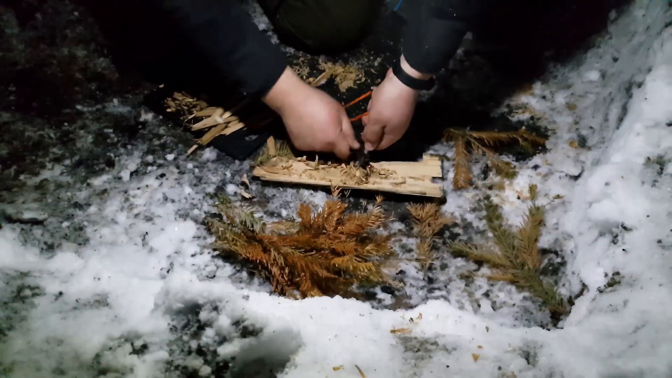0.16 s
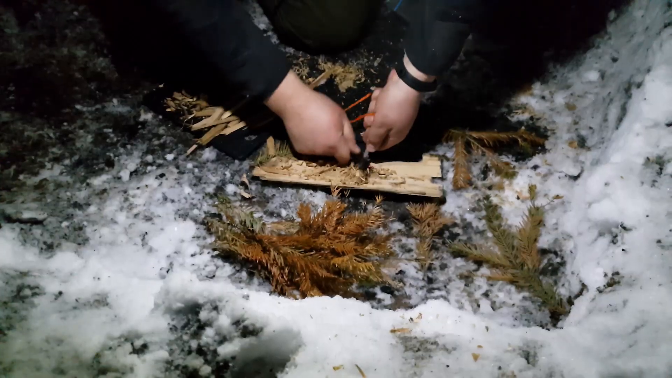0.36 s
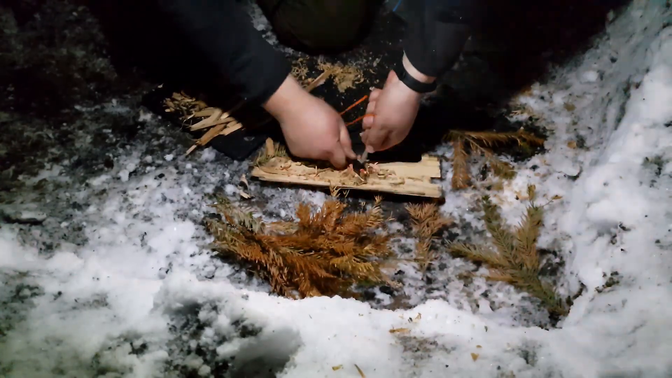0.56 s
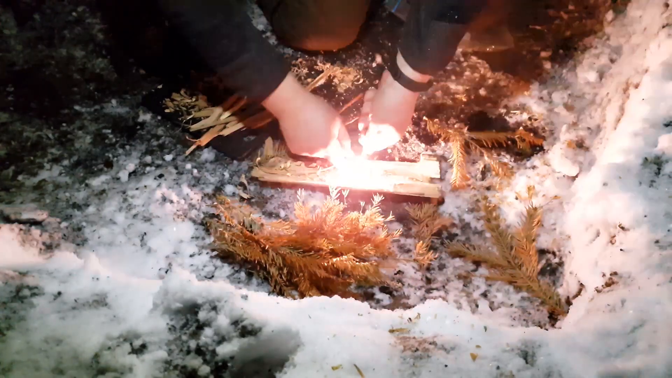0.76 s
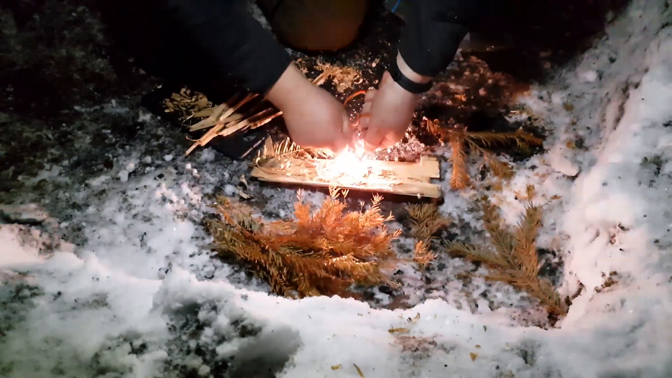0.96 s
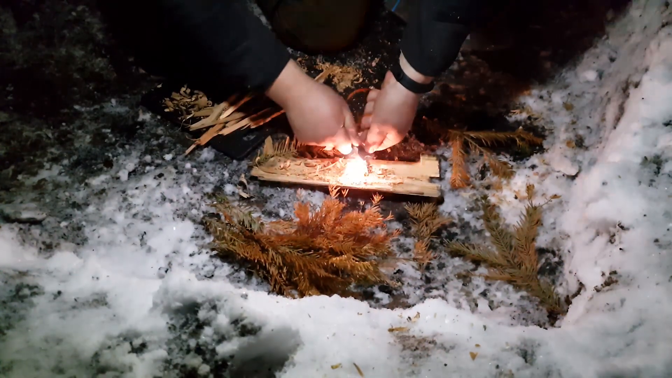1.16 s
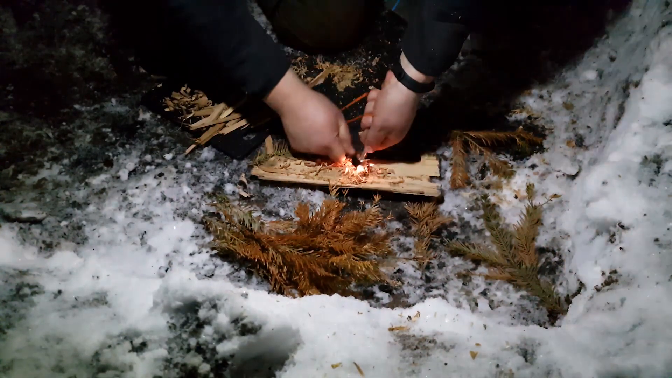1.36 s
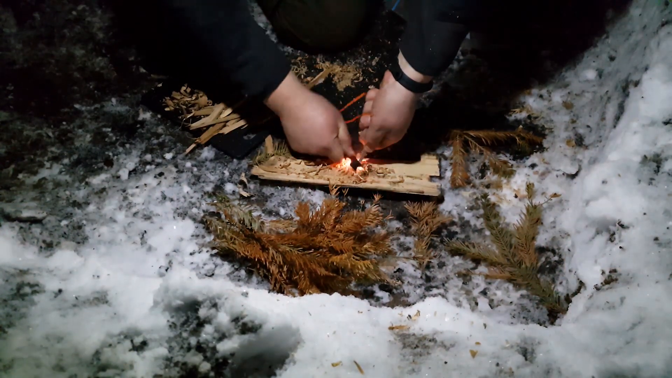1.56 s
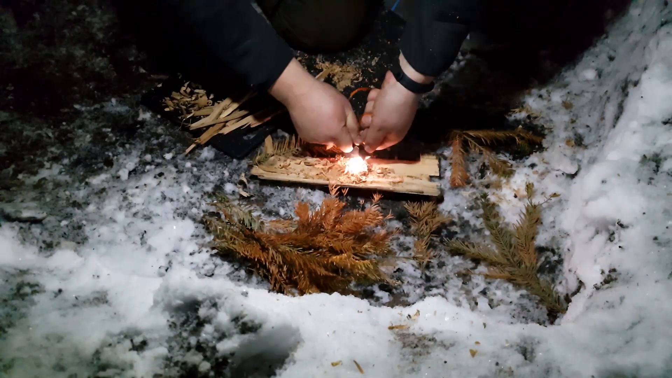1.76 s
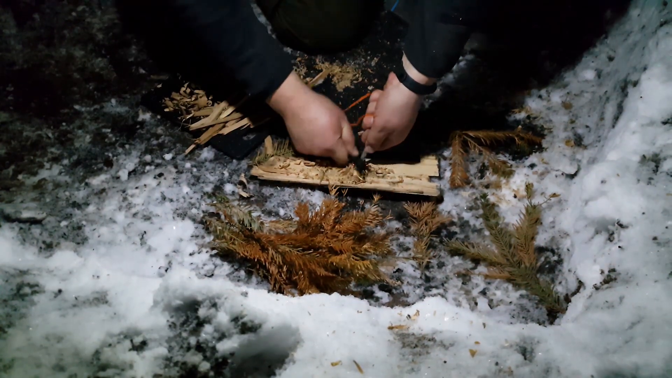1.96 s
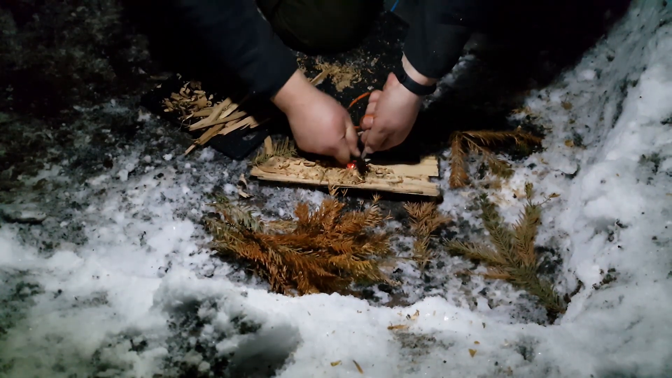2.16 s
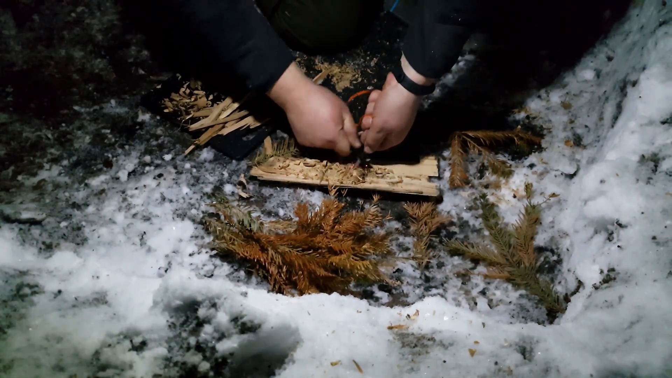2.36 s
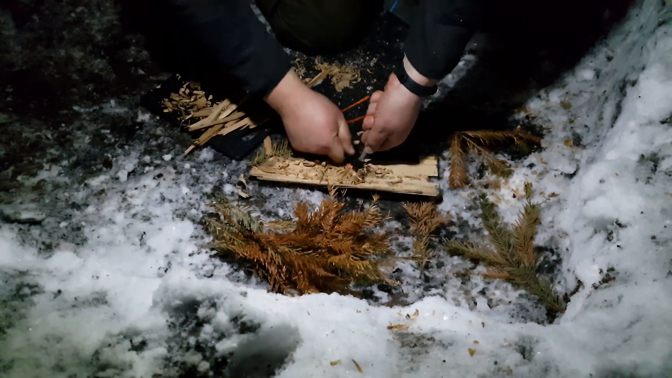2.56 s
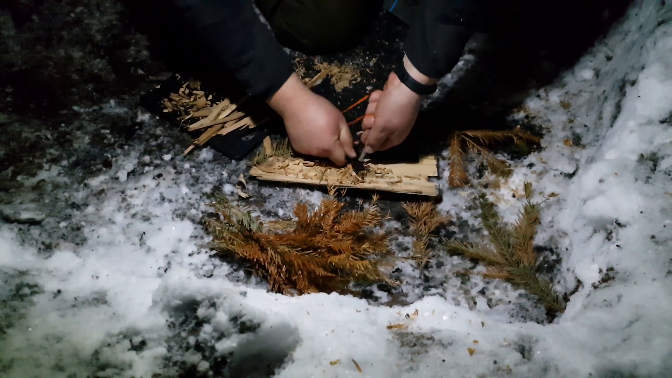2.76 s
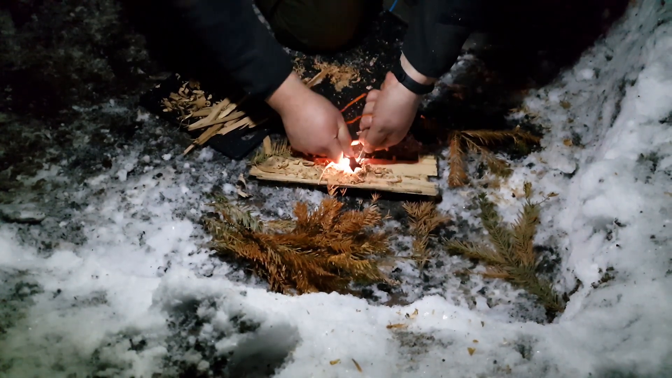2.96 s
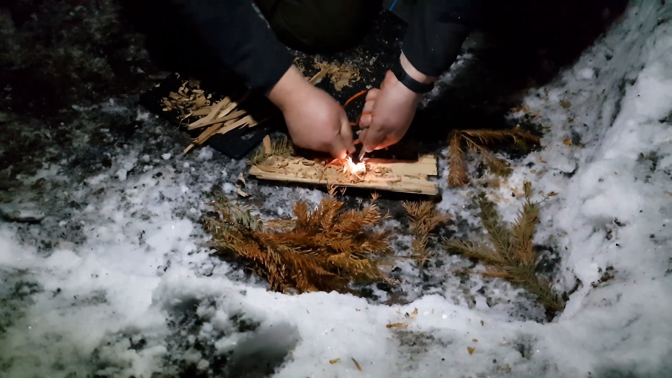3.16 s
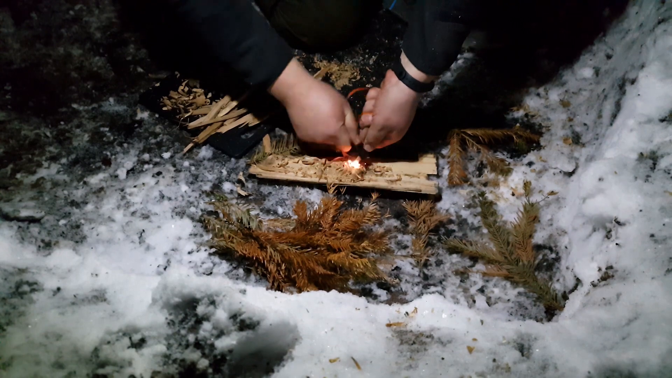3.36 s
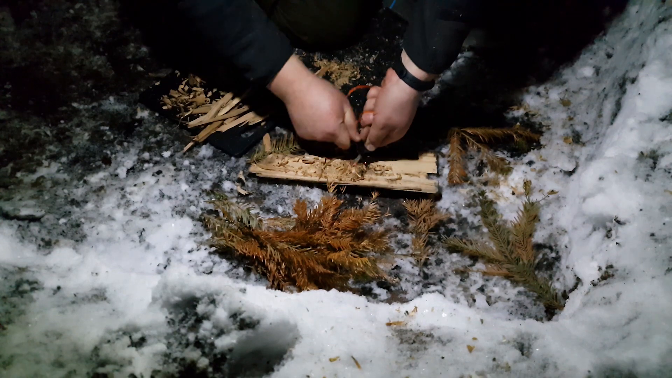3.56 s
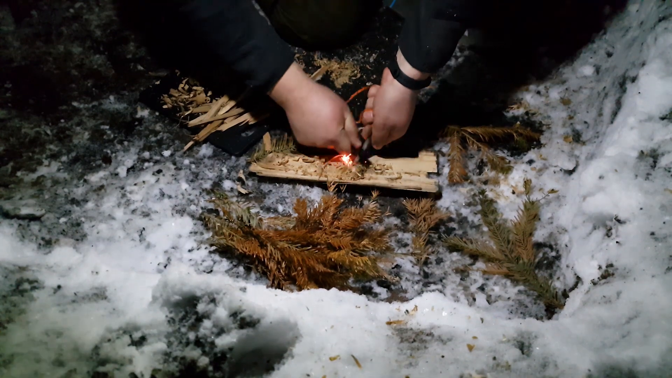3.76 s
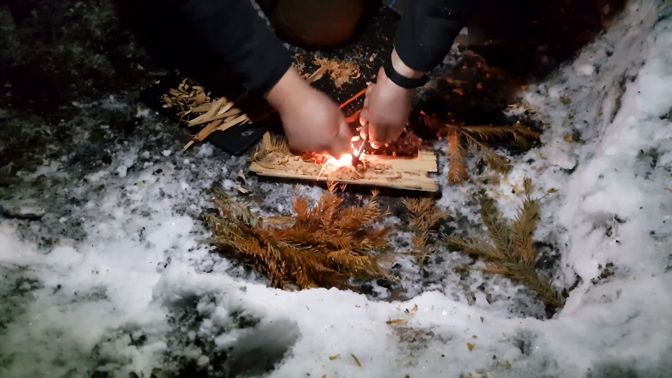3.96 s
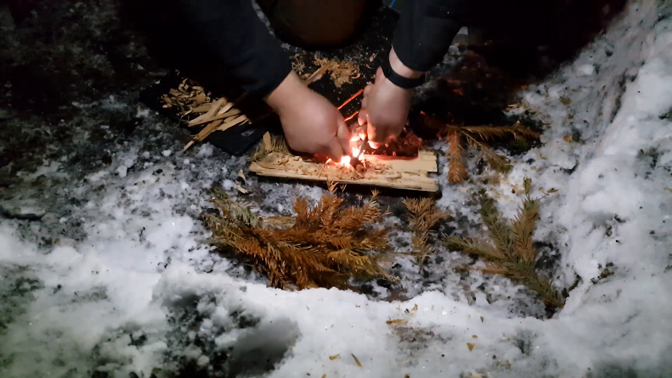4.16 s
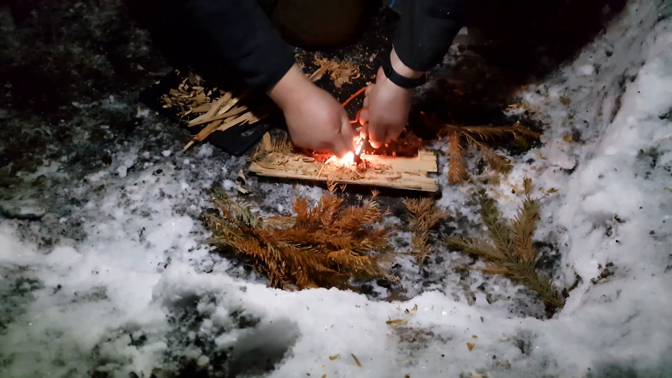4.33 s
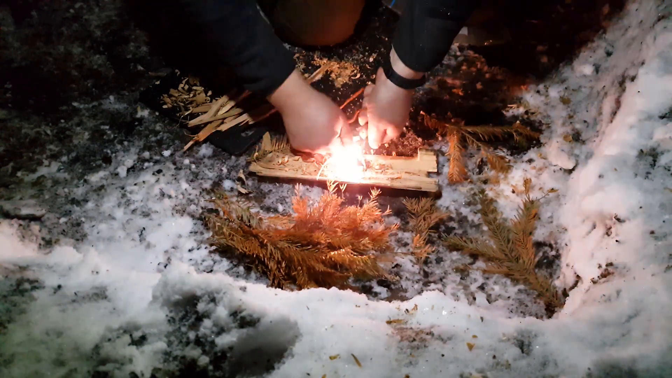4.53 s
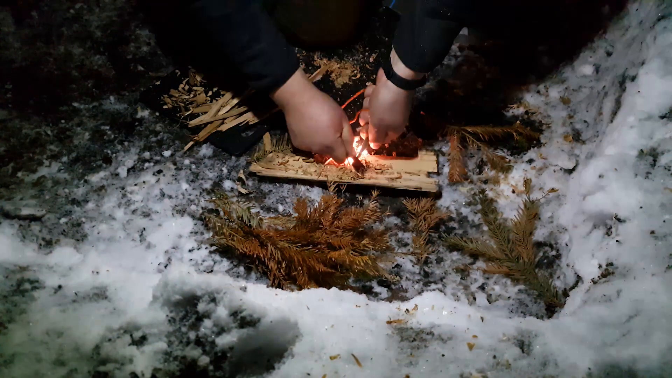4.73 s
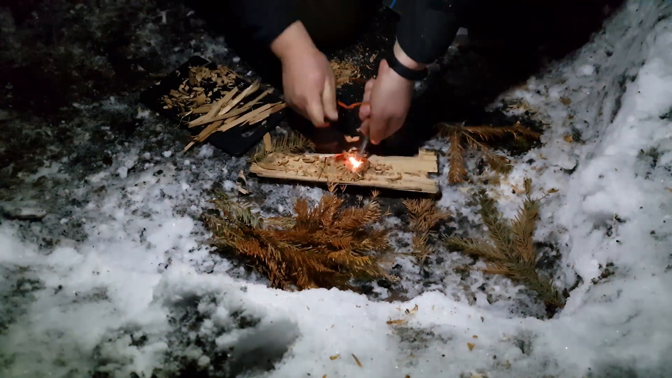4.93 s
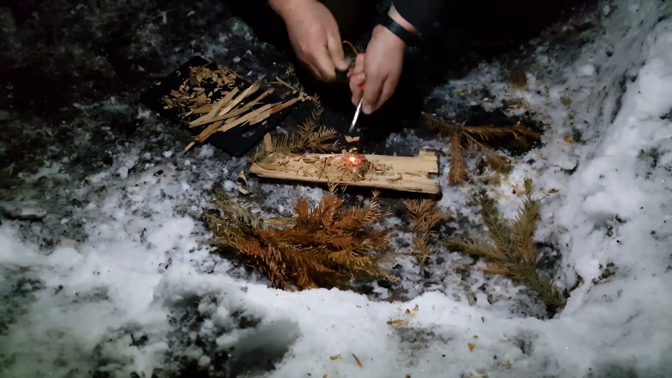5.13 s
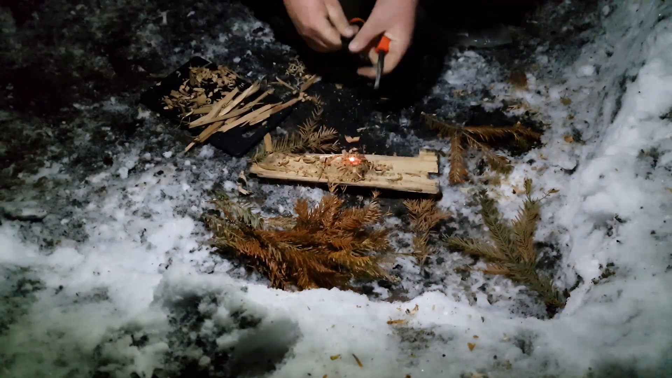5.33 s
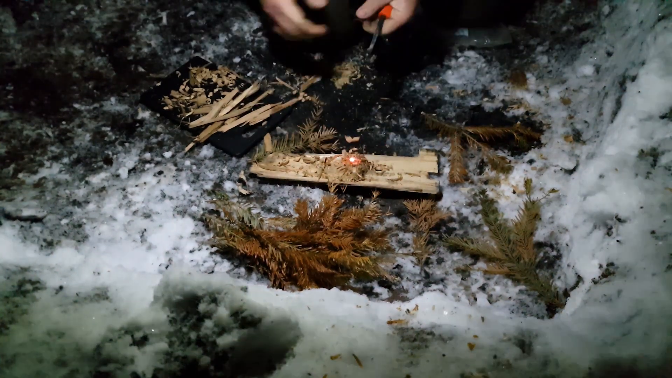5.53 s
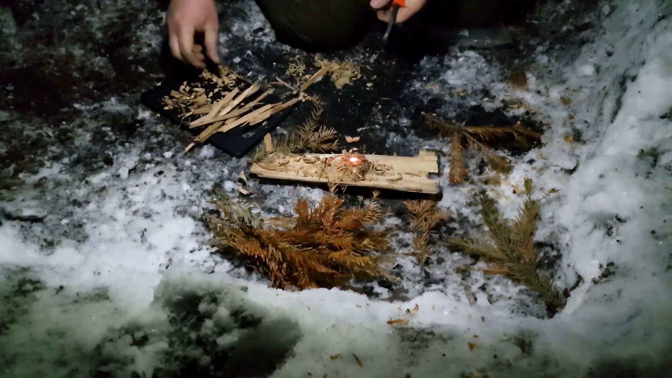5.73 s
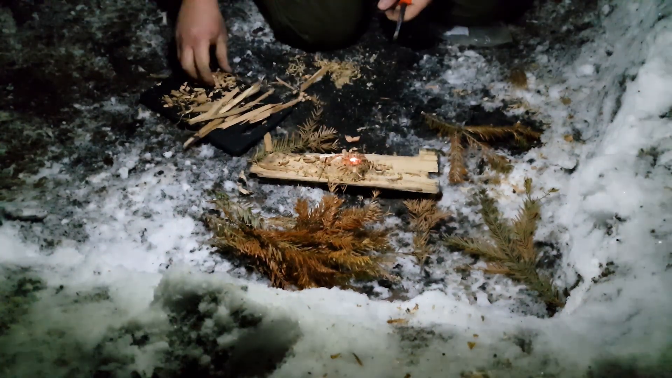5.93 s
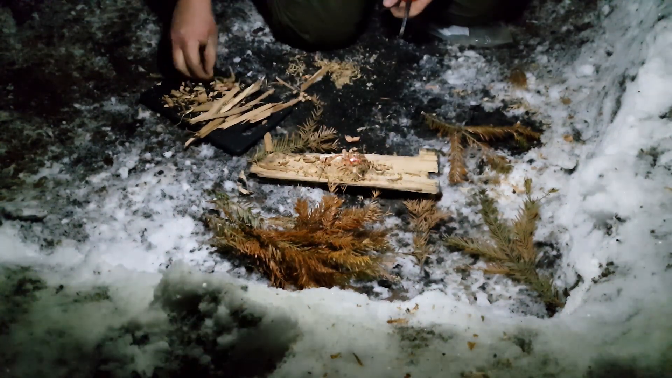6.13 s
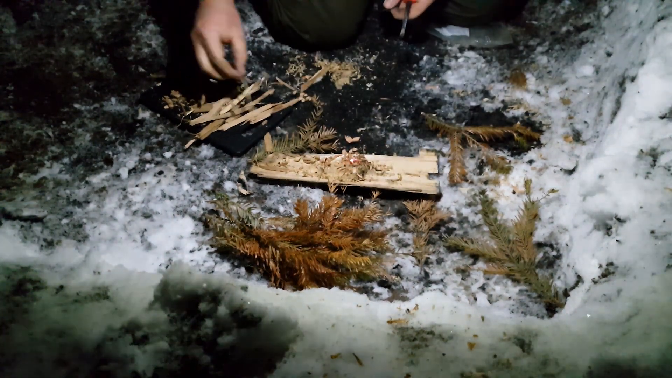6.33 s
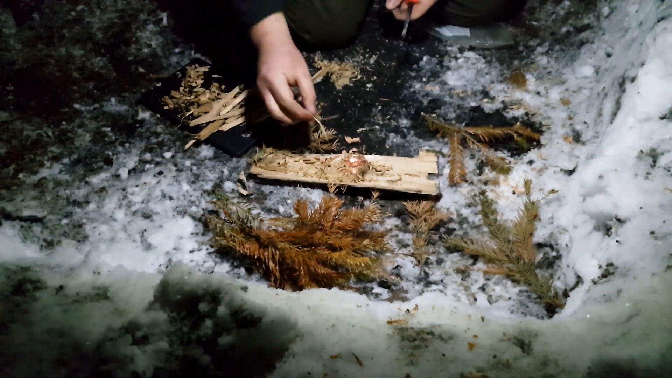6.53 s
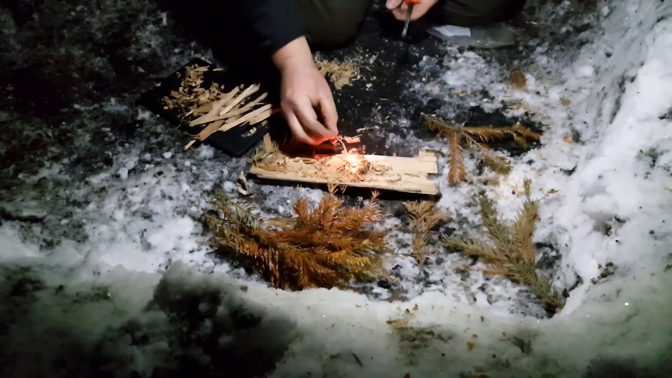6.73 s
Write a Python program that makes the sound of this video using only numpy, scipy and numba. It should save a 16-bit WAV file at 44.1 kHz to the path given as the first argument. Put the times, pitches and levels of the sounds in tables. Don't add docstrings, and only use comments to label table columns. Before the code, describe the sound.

From the very start, a steel striker scrapes a spark rod in quick back-and-forth strokes, roughly thirteen a second, its tip grinding a small wooden board. Each stroke is a short, gritty, bright rasp with a dry woody middle. Uneven clacks of the striker catching the board stand out, notably near 0.3, 1.3, 1.75, 3.2, 4.05 and 4.6 s. Metal dust sizzles most around 1 s and from 3.9 s, with sharp spark pops throughout. Strokes lengthen and run together after 3.9 s, stopping at 4.8 s. The fizz and last pops fade by about 5.2 s as a sleeve swishes briefly. Then it is much quieter: sparse tiny ticks, becoming denser from 6 to 6.7 s with a soft rustle, as fingers handle shavings and twigs. Faint outdoor rumble lies beneath. The stereo microphone is close and dry, sound weighted left.

```python
import sys
import numpy as np
from scipy import signal
from scipy.fft import rfft, irfft
from scipy.io import wavfile
from scipy.ndimage import uniform_filter1d
from numba import njit

SR = 44100
rng = np.random.default_rng(int(sys.argv[2]) if len(sys.argv) > 2 else 0)


def invert_db(level):
    return 10 ** (np.asarray(level, dtype=float) / 20)


def dump_mix(stems):
    frames = np.atleast_2d(stems).T
    limited = np.clip(frames, -1, 1)
    pcm = np.round(limited * 32767).astype(np.int16)
    wavfile.write(sys.argv[1], SR, pcm)


N = 303849

# pitch_hz [Hz], width_hz [Hz], level_db [dB]
BOARD_LOW = [(620, 200, -9.5), (900, 260, -7), (1200, 220, -1), (1430, 260, -1.5)]
# pitch_hz [Hz], width_hz [Hz], level_db [dB]
BOARD_HIGH = [(1950, 330, -1), (2300, 400, -5.5)]
# pitch_hz [Hz], width_hz [Hz], level_db [dB]
STEEL = [(3600, 900, -2), (5200, 1300, -4), (6500, 1200, 1.5)]
# pitch_hz [Hz], width_hz [Hz], level_db [dB]
EDGE = [(10800, 1800, -3.5), (12800, 1300, -3), (15300, 1600, -2.5)]
# pitch_hz [Hz], width_hz [Hz], level_db [dB]
GROUND = [(110, 70, 0), (190, 110, 0), (270, 110, -2)]


def curve(table):
    start_s, *columns = np.transpose(table)
    t = np.arange(N) / SR
    return [np.interp(t, start_s, column, left=-120, right=-120) for column in columns]


def over_hz(table):
    pitch_hz, value = np.transpose(table)
    every_hz = np.fft.rfftfreq(N, 1 / SR)
    return np.interp(np.log(every_hz + 1), np.log(pitch_hz), value)


def walk(rate_hz):
    hold = int(SR / rate_hz)
    levels = rng.standard_normal(N // hold + 1)
    return uniform_filter1d(np.repeat(levels, hold), hold // 2)[:N]


@njit
def resonator(x, pitch_hz, width_hz):
    y = np.empty(len(x))
    band, low = 0., 0.
    for i in range(len(x)):
        g = np.tan(np.pi * pitch_hz[i] / SR)
        damping = width_hz / pitch_hz[i]
        v = (band + g * (x[i] - low)) / (1 + g * (g + damping))
        band = 2 * v - band
        low = low + 2 * g * v
        y[i] = damping * v
    return y


def body(x, modes, drift=0.):
    out = 0
    for k, (pitch_hz, width_hz, level_db) in enumerate(modes):
        centre = np.minimum(pitch_hz * (1 + drift * walk(12)), .45 * SR)
        once = resonator(x, centre, 1.5 * width_hz)
        twice = resonator(once, centre, 1.5 * width_hz)
        out = out + (-1) ** k * invert_db(level_db) * twice
    return out


def grind(envelope, modes, rate, spread_db, bed, drift):
    hits = rng.random(N) < rate / SR
    grains = hits * invert_db(spread_db * rng.exponential(size=N)) * rng.standard_normal(N)
    grit = grains / np.std(grains) + bed * rng.standard_normal(N)
    grit *= invert_db(2.5 * walk(90))
    gain = np.std(body(grit, modes))
    return body(grit * envelope, modes, drift) / gain


def strike(start_s, peak_db, modes, crumbs_db, crumbs_s):
    clicks = np.zeros(N)
    np.add.at(clicks, np.minimum((start_s * SR).astype(int), N - 1), invert_db(peak_db))
    spray = np.exp(-np.arange(int(6 * crumbs_s * SR)) / (crumbs_s * SR))
    crumbs = np.roll(signal.fftconvolve(clicks, spray)[:N], -30) * rng.standard_normal(N)
    single_click = np.arange(N) == 999
    peak = np.abs(signal.hilbert(body(single_click, modes)[:4096])).max()
    return body(clicks + invert_db(crumbs_db) * crumbs, modes) / peak


def air():
    # pitch_hz [Hz], level_db [dB per Hz]
    air_colour = [(15, -52), (25, -9.5), (74, -3), (130, -21), (170, -10.5), (256, -24), (1400, -46.5),
                  (1740, -27.5), (2760, -35.5), (16000, -45.5)]
    swelling = rng.standard_normal(N) * invert_db(1.5 * walk(3))
    x = irfft(rfft(swelling) * invert_db(over_hz(air_colour)), N)
    return x * invert_db(-62.5) / np.std(x)


def contact(start_s, end_s, start_db, end_db, rise_s, fall_s):
    t, out = np.arange(N) / SR, np.zeros(N)
    for start, end, first_db, last_db in zip(start_s, end_s, start_db, end_db):
        part = slice(max(int((start - .04) * SR), 0), int((end + .05) * SR))
        before = np.maximum(start - t[part], 0)
        after = np.maximum(t[part] - end, 0)
        ramp = invert_db(np.interp(t[part], [start, end], [first_db, last_db]))
        out[part] += ramp * np.exp(-before / rise_s - after / fall_s)
    return out


def scraping():
    # start_s [s], end_s [s], board_start_db [dB], board_end_db [dB], steel_db [dB],
    # edge_db [dB against the steel]
    strokes = [(0.0, 0.011, -50.0, -55, -65, -15), (0.027, 0.114, -38.5, -39, -38, -3.7),
               (0.141, 0.186, -41.5, -41.5, -46.5, -7), (0.225, 0.294, -39.5, -40.5, -39, -9),
               (0.322, 0.368, -39, -40.5, -46.5, -7), (0.4, 0.48, -45, -36, -39.5, -2),
               (0.509, 0.556, -40.5, -44, -38.5, -9.5), (0.588, 0.645, -41, -42.5, -37, -2),
               (0.683, 0.737, -42, -41.5, -34.5, -9), (0.766, 0.821, -47.5, -28, -34, -7.4),
               (0.86, 0.907, -40, -39.5, -52.5, -1.5), (0.938, 0.988, -42.5, -37.5, -35.5, -5.5),
               (1.021, 1.076, -39, -44, -37.5, -5.5), (1.1, 1.151, -34.5, -36, -31, -11),
               (1.177, 1.213, -36.5, -39.2, -37.5, -9), (1.247, 1.326, -43.5, -46, -40.9, -8),
               (1.335, 1.378, -42, -43.5, -45, -4), (1.41, 1.473, -38.5, -40, -38.5, -7.5),
               (1.501, 1.539, -40.0, -38, -38, -3.2), (1.574, 1.63, -39.5, -40.5, -45.5, -6.5),
               (1.652, 1.693, -39.5, -45.1, -43.5, -4.5), (1.726, 1.765, -41.5, -33.5, -38.5, -8.2),
               (1.799, 1.833, -41.5, -42.0, -36, -5), (1.866, 1.938, -41.5, -45.5, -38.5, -8.5),
               (1.959, 1.992, -42, -44, -58, -2), (2.015, 2.071, -44, -40, -39, -5.5),
               (2.088, 2.12, -45.5, -36, -44.2, -6.5), (2.153, 2.215, -44, -40.5, -37.5, -6.5),
               (2.231, 2.271, -48, -42.5, -50.5, -7), (2.295, 2.344, -33.5, -41, -42.5, -6),
               (2.377, 2.42, -41.5, -40.5, -41.5, -7.5), (2.44, 2.493, -40, -39.5, -39.5, -9.5),
               (2.53, 2.571, -39.5, -40.5, -42.5, -8.5), (2.599, 2.674, -39, -47, -41.5, -6.5),
               (2.688, 2.726, -41, -38, -40.5, -11), (2.783, 2.841, -34.5, -42.5, -31.5, -6.5),
               (2.881, 2.938, -50, -46, -55, -7), (2.965, 3.009, -41, -27, -35, -7.5),
               (3.054, 3.097, -38, -41, -34.5, -10), (3.133, 3.201, -45.5, -39, -41.5, -2),
               (3.228, 3.275, -44, -41, -37, -10), (3.302, 3.361, -45, -40, -39.5, -7.5),
               (3.4, 3.455, -44.5, -48.5, -48, -9.2), (3.467, 3.524, -46, -40.5, -37.5, -7.5),
               (3.571, 3.619, -40.5, -50.5, -47.5, -5.5), (3.65, 3.72, -52, -41.5, -37.5, -9),
               (3.74, 3.785, -41.6, -45, -38.5, -7.5), (3.822, 3.895, -50.5, -40, -37.5, -3),
               (3.907, 3.994, -48.5, -48, -37.5, -7.5), (4.007, 4.139, -43.5, -47.4, -35.5, -10),
               (4.179, 4.234, -47.5, -43.5, -41.3, -2.5), (4.247, 4.311, -50.5, -39, -40.5, -6.5),
               (4.356, 4.436, -43, -44, -40, -1), (4.437, 4.521, -41, -43.5, -36.5, -8.5),
               (4.522, 4.608, -45.5, -46, -40.5, -2.5), (4.609, 4.673, -43, -45, -36, -5.9),
               (4.692, 4.79, -48, -38, -40.5, -7.5)]
    # start_s [s], level_db [dB]
    shake = [(0.0, -58.5), (1.48, -54.5), (1.49, -58), (4.76, -53.5), (5.0, -69)]
    start_s, end_s, start_db, end_db, steel_db, edge_db = np.transpose(strokes)
    lean = .3 * (end_db - start_db)
    edge_db = edge_db + steel_db

    push = contact(start_s, end_s, start_db, end_db, .004, .004)
    steel_push = contact(start_s, end_s, steel_db - lean, steel_db + lean, .005, .006)
    edge_push = contact(start_s, end_s, edge_db - lean, edge_db + lean, .005, .005)
    pulsing = .6 + .8 * np.tanh(push / invert_db(-45))
    ground_push = invert_db(curve(shake)[0]) * pulsing

    board = grind(push, BOARD_LOW + BOARD_HIGH, rate=1500., spread_db=2.5, bed=.4, drift=.05)
    steel = grind(steel_push, STEEL, rate=4000., spread_db=3.5, bed=.5, drift=.06)
    edge = grind(edge_push, EDGE, rate=5000., spread_db=3.5, bed=.5, drift=.03)
    ground = grind(ground_push, GROUND, rate=300., spread_db=3., bed=.6, drift=.05)
    return invert_db(-0.52) * board + steel + invert_db(0.3) * edge + invert_db(1.06) * ground


def sparks():
    # start_s [s], level_db [dB], top_db [dB against the level]
    sizzle = [
        [(0.0, -63, -12.5), (0.99, -39, -5), (2.49, -65.5, -12.5), (2.99, -54.5, -8), (3.18, -45, -17.5),
         (3.53, -63, -8), (3.92, -39, -11.5), (4.52, -40.5, -10.5), (4.8, -42, -13.5)],
        [(4.8, -43, -8), (4.922, -45.5, -7.5), (5.2, -53.5, -2)],
    ]
    # start_s [s], peak_db [dB], top_db [dB against the peak]
    pops = [(0.0024, -46.8, -16.4), (0.1188, -36.2, -13), (0.1263, -37, -4), (0.165, -30, -21),
            (0.2289, -29, -12), (0.2537, -22.5, -5), (0.2844, -22, -22.5), (0.3505, -32, -12.5),
            (0.4596, -24.5, -6), (0.5313, -28.5, -5), (0.6852, -29, -7.5), (0.7062, -21, -13),
            (0.9475, -23, -0.1), (0.979, -24, -15), (1.0054, -32, -10), (1.0146, -30.5, -10.5),
            (1.089, -22, -9.5), (1.1025, -29.5, -14), (1.1514, -25.5, -12.5), (1.218, -29, 0),
            (1.2252, -36.5, -4.5), (1.2443, -39, -10.5), (1.3729, -30.5, -2.5), (1.3861, -33, -0.1),
            (1.4731, -33.5, -13), (1.5141, -28.5, -3), (1.5231, -27.5, -4.5), (1.6183, -25, -15.5),
            (1.6276, -20, -20), (1.6509, -30, -6.8), (1.6794, -31.5, 0.1), (1.7155, -39.1, 5),
            (1.8497, -29, 1), (1.8649, -34, -2), (1.9716, -35.5, -12), (1.9774, -33, -13.5),
            (2.1907, -22, -6.5), (2.3209, -23.5, -5.5), (2.3629, -43.6, -14.7), (2.4586, -24, -15.5),
            (2.5108, -53, -8.6), (2.5372, -29.5, -15.5), (2.7945, -20.5, -16.5), (2.9212, -36.5, -16),
            (3.0177, -27.5, -13.4), (3.0443, -17.5, -17.5), (3.0897, -28.5, -5.5), (3.1088, -32, -5.4),
            (3.2315, -33.5, -14.5), (3.3326, -22.5, -14), (3.4462, -35.5, -13.6), (3.4687, -20, -14.5),
            (3.602, -33, -17), (3.7196, -22.5, -18), (3.7567, -32.5, -15), (3.8014, -35.5, -6.5),
            (3.8832, -24.5, -18.5), (3.9139, -23, -16.5), (3.9826, -26, -13), (4.0121, -23.5, -15.5),
            (4.1138, -24, -12.5), (4.1505, -27.5, -7), (4.1803, -30.5, -10.5), (4.2255, -25.5, -19),
            (4.2486, -26, -11.5), (4.4201, -18.5, -20.5), (4.4319, -29, -18.5), (4.5972, -25.5, -13),
            (4.6582, -35.5, -10.5), (4.703, -24, -12), (4.745, -32.5, 1), (4.8354, -32, -9.5),
            (4.8613, -27.5, -15.5), (4.8723, -23.5, -9), (4.9159, -30, -14), (4.9399, -25, -11),
            (4.9698, -48, -7.5), (4.9788, -29, -5.5), (5.0102, -49, -14.6), (5.0272, -28, -7),
            (5.1248, -35, -14.5), (5.1313, -34.5, -12.5), (5.1517, -44.5, -9)]
    first, second = (curve(table) for table in sizzle)
    level_db = np.maximum(first[0], second[0])
    top_db = np.maximum(first[1], second[1])
    fizz = grind(invert_db(level_db), STEEL, rate=3000., spread_db=4., bed=.5, drift=.05)
    fizz += grind(invert_db(level_db + top_db), EDGE, rate=3500., spread_db=4., bed=.5, drift=.03)
    under = grind(invert_db(level_db - 12.5), BOARD_LOW + BOARD_HIGH, rate=2000., spread_db=3., bed=.6, drift=.05)

    start_s, peak_db, pop_top_db = np.transpose(pops)
    bursts = strike(start_s, peak_db - 3.0, STEEL, crumbs_db=-10.5, crumbs_s=.0012)
    bursts += strike(start_s, peak_db + pop_top_db - 3.0, EDGE, crumbs_db=-3.0, crumbs_s=.001)
    return fizz + under + bursts


def knocks():
    # start_s [s], peak_db [dB], tilt_db [dB, upper against lower board resonances],
    # steel_db [dB against the peak]
    hits = [(0.0576, -28.5, -8.5, 7.5), (0.0941, -31, 5, -17), (0.1432, -19.5, 7.5, -17),
            (0.328, -16, 9.5, -5), (0.464, -32.5, 22, -10), (0.4754, -26, 6.5, -17.5),
            (0.5133, -33.5, -3, -10.4), (0.6369, -34.5, 7, -1), (0.642, -29, -7, -1.5),
            (0.7861, -33, -14, 6.5), (0.7952, -21.5, -2.5, -3), (0.8139, -18, 8.5, -0.5),
            (0.9451, -29.5, -15, -3.5), (0.984, -28.5, 9, -0.2), (1.121, -31.5, -3.0, -4.5),
            (1.1402, -34.5, 5, -11), (1.3004, -16, -2.5, -13), (1.4546, -20, 1.5, -5),
            (1.615, -18.5, -1, -9), (1.7576, -15.5, 5.5, -1.5), (1.9203, -26, -1.5, -4),
            (2.0912, -24, 9, -2), (2.097, -22.5, 2, -12), (2.1146, -36.5, -2, -0.5), (2.6376, -28.5, -4, 4),
            (2.69, -27, 15, -11), (2.8335, -29, -2, -6), (2.993, -22, -6.5, -12), (3.0056, -29, 6, -10.5),
            (3.0589, -29, -8, -4.2), (3.067, -24, 6.5, -8), (3.1763, -25.5, 2.9, -5),
            (3.1856, -17, -3, -16.5), (3.3495, -17.5, 0.5, -8), (3.5108, -29, -7.3, -8.5),
            (3.5182, -18.5, -4.5, -13.5), (3.6918, -30, 0, 0.5), (3.701, -25.5, -5, -8),
            (4.0351, -29, 3, -1.5), (4.0447, -12, 1, -13), (4.2196, -24, -4.5, -9), (4.5775, -28, -8, -6.5),
            (4.5828, -15.4, 3, -19)]
    start_s, peak_db, tilt_db, steel_db = np.transpose(hits)
    start_s = start_s - .0006
    low = strike(start_s, peak_db - 8 - tilt_db / 2, BOARD_LOW, crumbs_db=-14.5, crumbs_s=.002)
    high = strike(start_s, peak_db - 7.0 + tilt_db / 2, BOARD_HIGH, crumbs_db=-15.5, crumbs_s=.002)
    steel = strike(start_s, peak_db + steel_db + 0.5, STEEL, crumbs_db=-12.0, crumbs_s=.0015)
    edge = strike(start_s, peak_db + steel_db - 22, EDGE, crumbs_db=-2.0, crumbs_s=.001)
    thump = strike(start_s, peak_db - 32, GROUND, crumbs_db=-31.5, crumbs_s=.003)
    return low + high + steel + edge + thump


def hands():
    # start_s [s], level_db [dB], low_db [dB against the level]
    rustle = [(5.1, -39, -31), (5.254, -75.5, -9), (5.404, -63, -1), (6.216, -56, -24.5), (6.89, -71, -8.5)]
    # start_s [s], peak_db [dB], top_db and wood_db [dB against the peak]
    shavings = [(5.2466, -58, -17.0, -19), (5.3915, -54.9, -8.2, -4), (5.4899, -46, -8, -10.5),
                (5.5765, -42.2, -1, 5.5), (5.7012, -52.5, -27.6, 4.5), (5.7073, -59.4, -13.7, -4.5),
                (5.8559, -64.4, -8.7, -16.6), (5.9472, -50, -15.5, -24), (5.9578, -53, -7.9, -12),
                (6.0131, -42.5, -9.8, -6), (6.0471, -46, -9, -8), (6.0546, -39.5, -0.5, -8),
                (6.1614, -37.5, -11, -16), (6.1742, -36.5, -7, -22.6), (6.2072, -42.5, -8, -20.5),
                (6.23, -53, -13, -20), (6.2623, -50, -18.9, -19), (6.2915, -53, -6.7, -21.0),
                (6.2974, -50.5, -3.7, -20.2), (6.3341, -52, -6.3, -29), (6.3469, -54, -7.4, -19.9),
                (6.3928, -45.5, -11, -16), (6.4086, -59, -11.3, -11), (6.4173, -52, 0.5, -24.0),
                (6.446, -50, 0.9, -22), (6.479, -41, -11.5, -27.4), (6.501, -46, -15, -12),
                (6.5432, -50, -3, -7), (6.5611, -47, 0.5, -16), (6.5709, -37.5, -10, -5),
                (6.6066, -52, 2, -5), (6.6133, -57, -7.0, -9), (6.6376, -49, -3, -16.4),
                (6.652, -58, -1, -4), (6.6629, -53, -3.5, -15.5), (6.6763, -49.7, -15, -12),
                (6.7434, -60, -4.5, -13), (6.8191, -56, -9, -20.1), (6.847, -62, -13.5, -20),
                (6.871, -51, -12.6, -33), (6.8857, -67, -14, -18)]
    # pitch_hz [Hz], width_hz [Hz], level_db [dB]
    cloth = [(780, 160, 6), (1200, 300, -1.5), (1560, 160, 3.5)]
    level_db, low_db = curve(rustle)
    bright = [(2800, 500, -3.5)] + STEEL
    swish = grind(invert_db(level_db - 2.0), bright, rate=3000., spread_db=3., bed=.7, drift=.04)
    sheen = grind(invert_db(level_db - 7.5), EDGE, rate=3200., spread_db=3., bed=.7, drift=.03)
    rub = grind(invert_db(level_db + low_db - 2.0), cloth, rate=1200., spread_db=2.5, bed=.8, drift=.03)

    start_s, peak_db, top_db, wood_db = np.transpose(shavings)
    ticks = strike(start_s, peak_db, STEEL, crumbs_db=-7.5, crumbs_s=.001)
    ticks += strike(start_s, peak_db + top_db + 2.5, EDGE, crumbs_db=-7.5, crumbs_s=.0008)
    wood = strike(start_s, peak_db + wood_db - 7.0, cloth + BOARD_HIGH, crumbs_db=-4.5, crumbs_s=.002)
    return swish + sheen + rub + ticks + wood


def scene():
    # pitch_hz [Hz], share [0-1]
    likeness = [(60, .97), (300, .9), (1400, .88), (3100, .6), (6800, .5), (15000, .25)]
    # pitch_hz [Hz], level_db [dB]
    left_over_right = [(60, 3), (110, 1), (200, -0.5), (380, 11.5), (700, 3), (1290, 8), (2380, 8),
                       (4400, 8), (8120, 7), (15000, 2.5)]
    near, other = (rfft(air() + scraping() + sparks() + knocks()) for _ in range(2))
    like = np.clip(over_hz(likeness), 0, 1)
    far = like * near + np.sqrt(1 - like ** 2) * other
    touch = rfft(hands())
    near = near + touch * invert_db(1.5)
    far = far + touch * invert_db(-0.5)
    shade = invert_db(over_hz(left_over_right) / 2)
    return invert_db(0.02) * np.array([irfft(near * shade, N), irfft(far / shade, N)])


def low_pass(x):
    return signal.sosfilt(signal.butter(12, 17110, fs=SR, output="sos"), x)


def record(dry):
    return low_pass(dry)


dry = scene()
out = record(dry)
dump_mix(out)
```